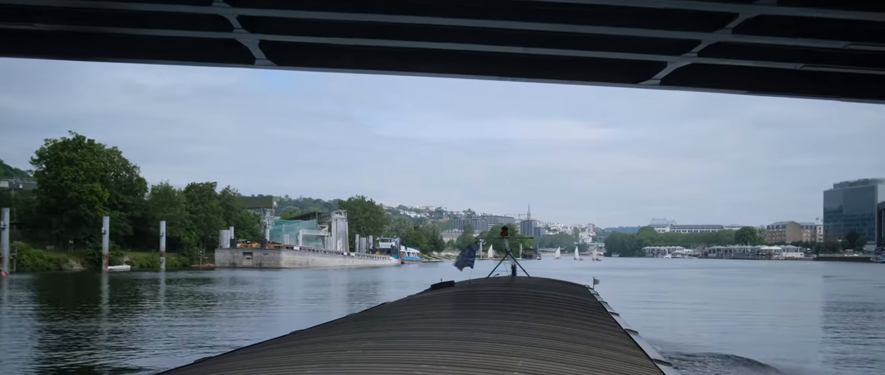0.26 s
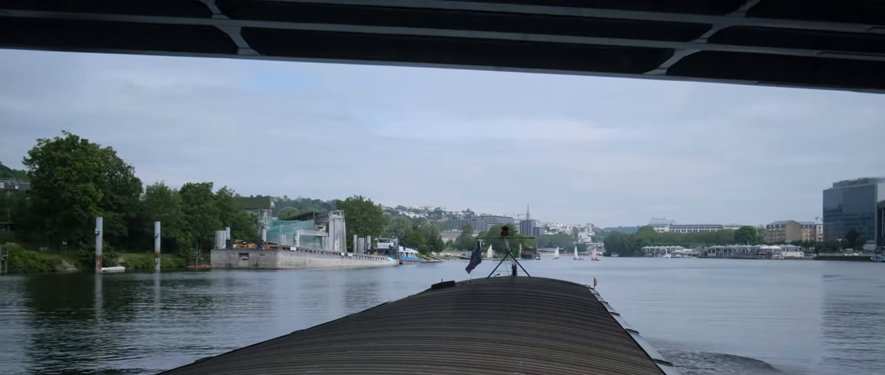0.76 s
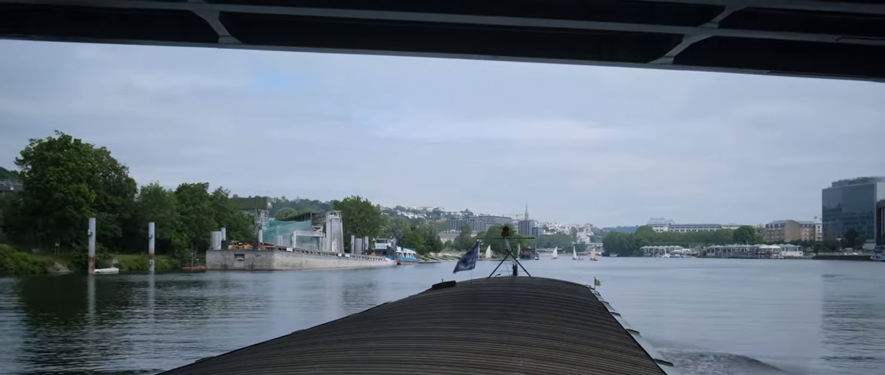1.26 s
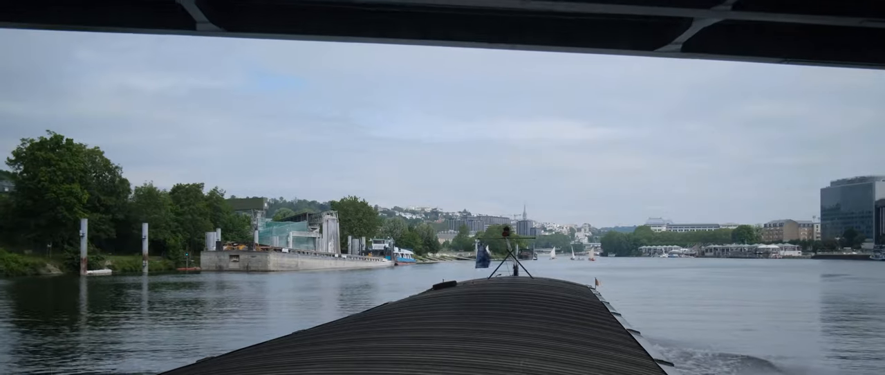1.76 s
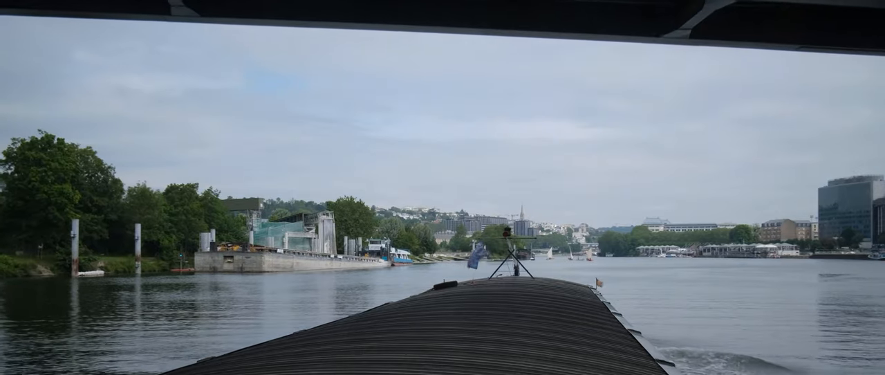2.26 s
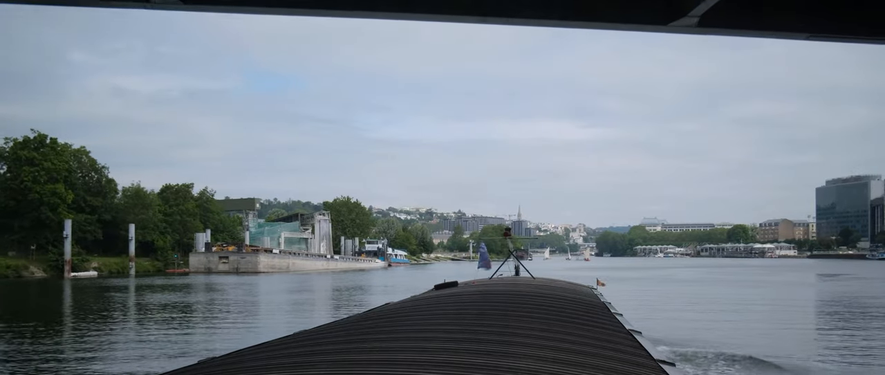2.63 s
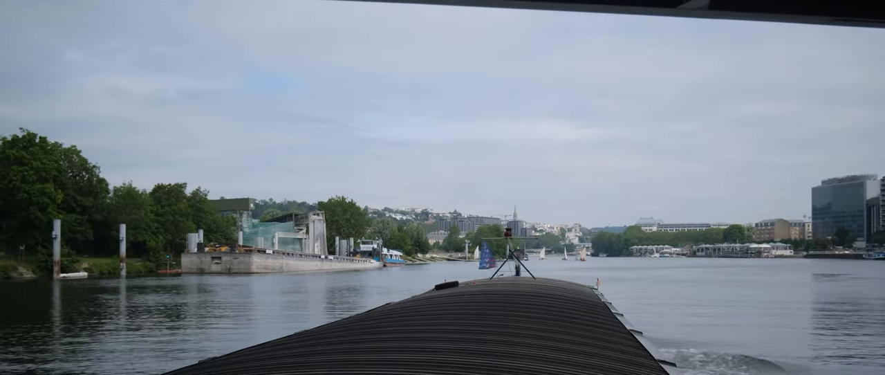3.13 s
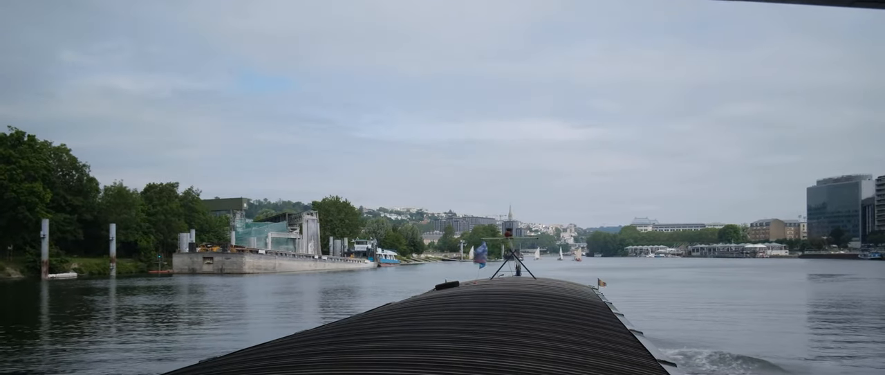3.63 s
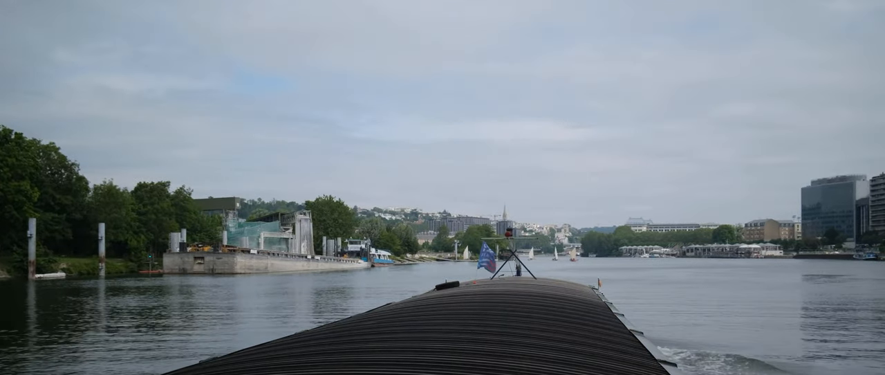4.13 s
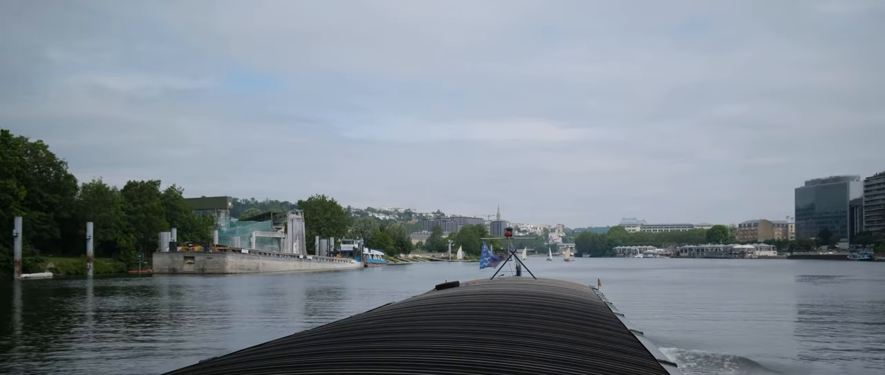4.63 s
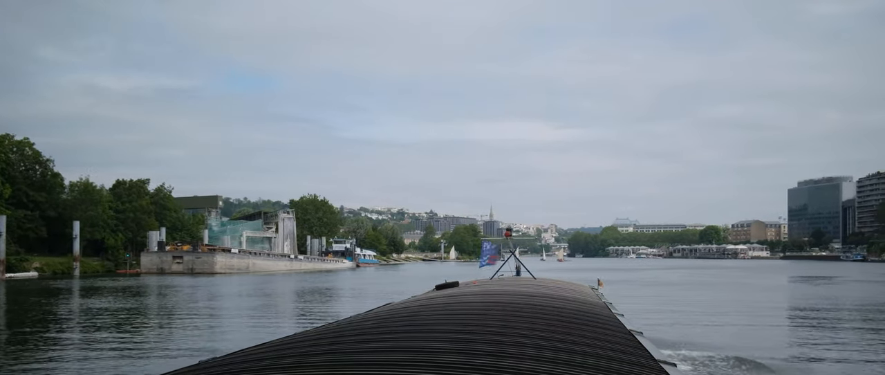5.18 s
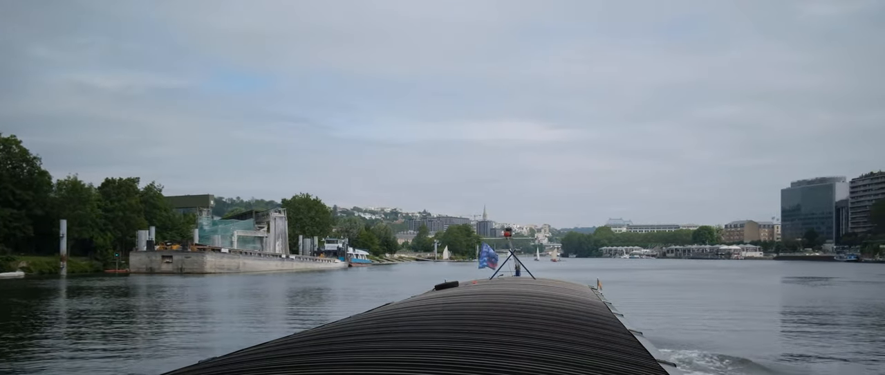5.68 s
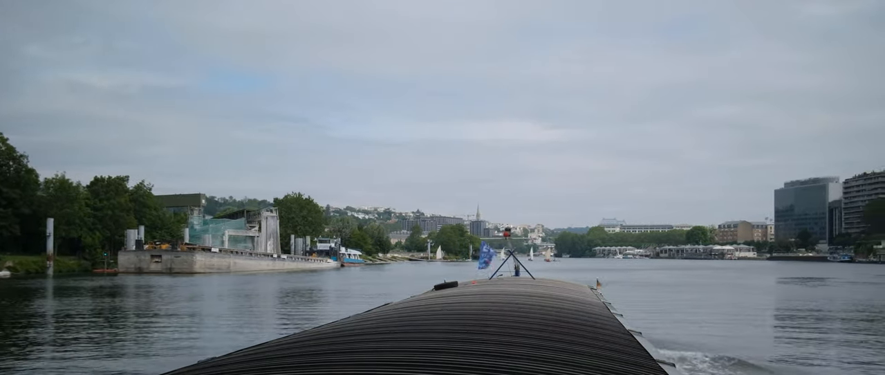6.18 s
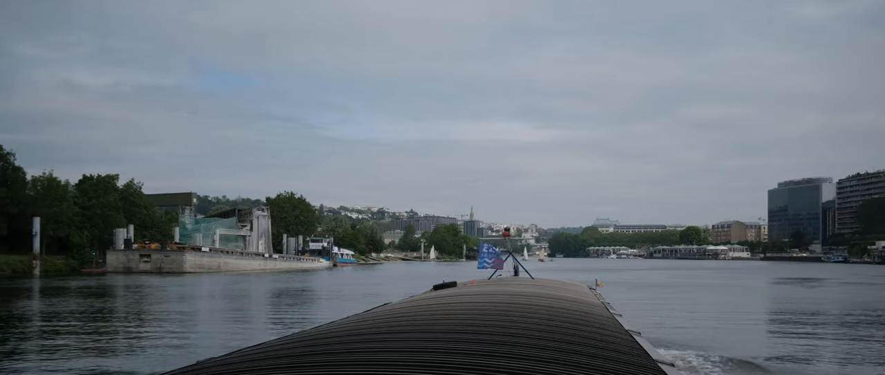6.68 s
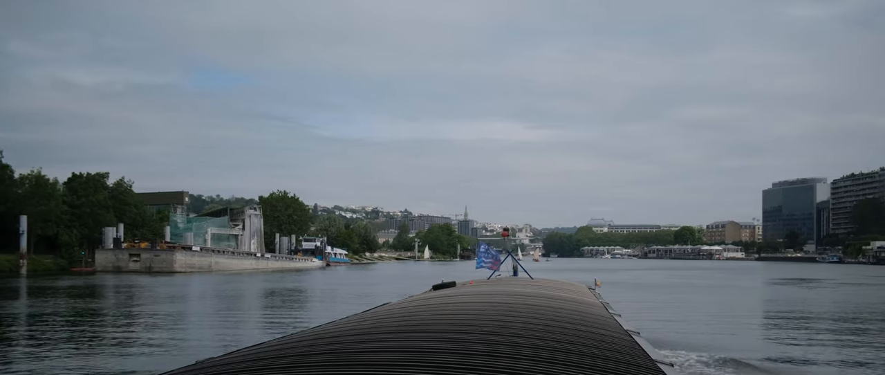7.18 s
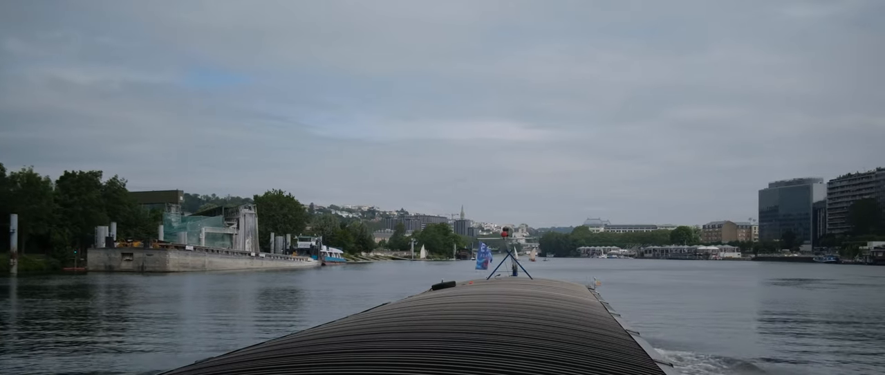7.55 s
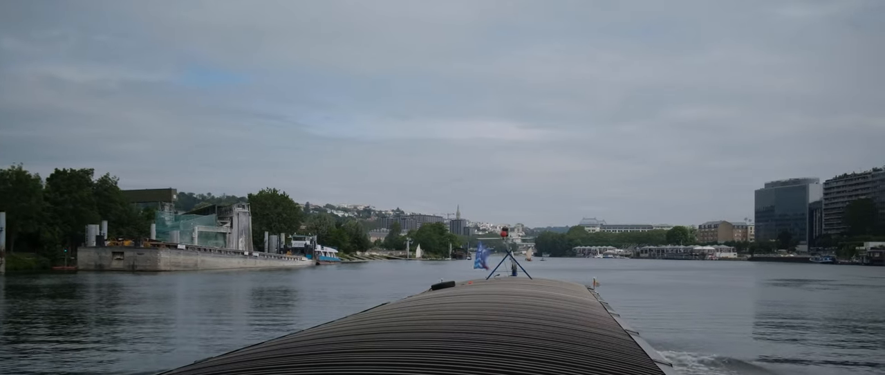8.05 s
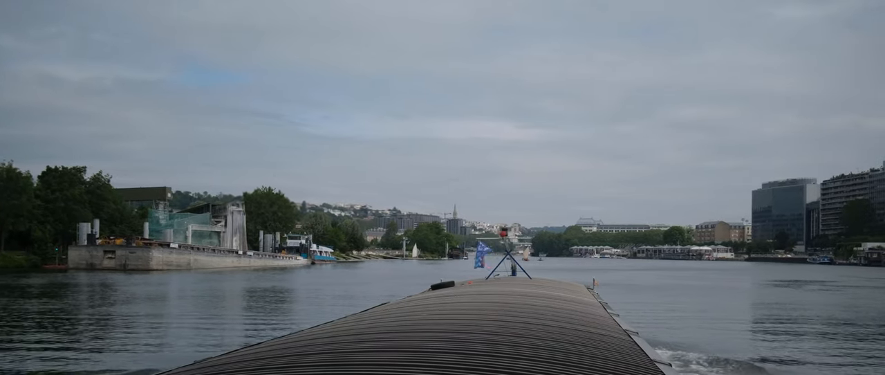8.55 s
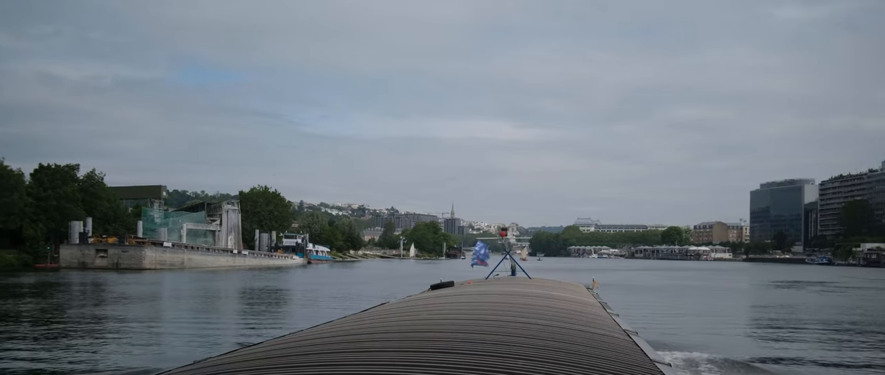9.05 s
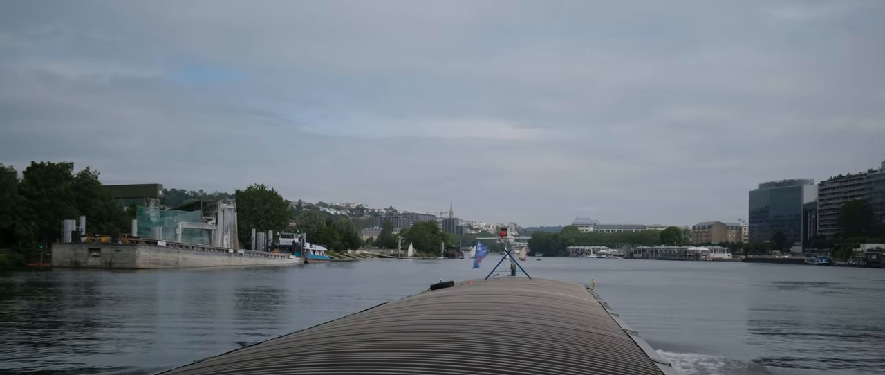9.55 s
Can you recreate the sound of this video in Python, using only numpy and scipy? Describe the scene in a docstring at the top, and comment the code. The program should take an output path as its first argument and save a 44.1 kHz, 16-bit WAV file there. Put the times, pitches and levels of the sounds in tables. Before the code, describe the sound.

A barge's diesel engine drones deep and steady under way, with a slow throb and faint water washing along the hull.

```python
"""A deep, throbbing drone: a barge's six-cylinder diesel at cruising speed, heard from the deck.
Exhaust tones at multiples of the firing rate sound over shaking hull plates and a slowly beating hum.
Behind them are engine-room roar, clinking covers, injector hiss, the river's bow wash and faint ticking.
The drone overloads the microphone on its negative swings, chopping these sounds at the firing rate."""
import sys
import numpy as np
from scipy import signal
from scipy.fft import rfft, irfft, next_fast_len
from scipy.io import wavfile
from scipy.ndimage import map_coordinates

SR = 44100
rng = np.random.default_rng(int(sys.argv[2]) if len(sys.argv) > 2 else 0)


def transcribe(signal):
    """Save signal, clipped to [-1, 1], as a 16-bit WAV file at the path in sys.argv[1]."""
    frames = np.atleast_2d(signal).T
    limited = np.clip(frames, -1, 1)
    pcm = np.round(limited * 32767).astype(np.int16)
    wavfile.write(sys.argv[1], SR, pcm)


N = 432621
TIME_S = np.arange(N) / SR
CYLINDERS = 6


def amp(db):
    """Decibels to gain."""
    return 10 ** (np.asarray(db) / 20)


def unit(x):
    """Scale to rms 1."""
    return x / np.sqrt(np.mean(x ** 2) + 1e-20)


def curve(rows):
    """Interpolate (seconds, value) rows to one value per sample."""
    return np.interp(TIME_S, *np.transpose(rows))


def wobble(rate_hz):
    """Smooth random curve, rate_hz knots a second."""
    grid = np.arange(0, N + 64, 64)
    coarse = map_coordinates(rng.standard_normal(size=1024), [grid * rate_hz / SR], mode="wrap")
    return np.interp(np.arange(N), grid, coarse)


def bouts_db(rows, edge_s):
    """Gain that rises, holds and falls back for each row."""
    return sum(db * np.clip(np.minimum(TIME_S - start_s, start_s + length_s - TIME_S) / edge_s + .5, 0, 1)
               for start_s, length_s, db in rows)


def filtered(x, response):
    """Apply a frequency response, with mirrored ends."""
    pad = SR // 4
    size = next_fast_len(N + 2 * pad)
    wide = np.pad(x, pad, mode="reflect", reflect_type="odd")
    return irfft(rfft(wide, size) * response(np.fft.rfftfreq(size, 1 / SR)), size)[pad:pad + N]


def coloured(x, points):
    """Shape x by (Hz, dB) points on a log axis, to rms 1."""
    hz, db = np.transpose(points)
    size = next_fast_len(N)
    gain = amp(np.interp(np.log(np.fft.rfftfreq(size, 1 / SR) + 1), np.log(hz), db))
    return unit(irfft(rfft(x, size) * gain, size)[:N])


def lowpass(x, hz):
    """One-pole low-pass."""
    return signal.lfilter(*signal.butter(1, hz, fs=SR), x)


def coding_noise(level_db=-59.5):
    """A faint steady hiss, like audio-coding noise, continues through the overloaded troughs."""
    # Each row: frequency in Hz, relative density in dB.
    spectrum = [(200, 6.5), (1500, 7), (4000, -0.5), (7000, -8.5), (10500, -16), (16000, -16)]
    return amp(level_db) * coloured(rng.standard_normal(N), spectrum)


def ticking(cycle, scatter_db=7, offbeat_db=-3, t60_s=.004, sizzle=.17):
    """Something loose sizzles in bouts and ticks twice per shaft turn, strong then weak."""
    # Each row: start in seconds, length in seconds, gain of the shaking in dB.
    bouts = [(2.552, .4, 4), (4.3, .55, 4), (5.35, .45, 4), (6.151, .5, 5), (7.398, 1.3, 2.5),
             (9.25, .35, 3.5)]
    # Each row: frequency in Hz, relative density in dB.
    spectrum = [(3000, -20.5), (6000, -5), (9500, -2), (12000, -2), (16000, 0.5)]
    at = np.flatnonzero(np.diff(np.floor(2 * cycle / np.pi + .5)))
    accent_db = offbeat_db * (np.arange(len(at)) % 2) + scatter_db * rng.uniform(-1, 1, len(at))
    blows = np.bincount(at, amp(accent_db), N)
    decay = amp(-60 * np.arange(SR // 20) / SR / t60_s)
    ticks = (signal.fftconvolve(blows, decay)[:N] + sizzle) * rng.standard_normal(N)
    shaking = amp(-70.5 + bouts_db(bouts, edge_s=.2))
    force = np.maximum(shaking - amp(-75), 0)  # slack takes up part of the shaking
    return 2 * force * coloured(ticks, spectrum)


def bow_wash(level_db=-52.5, dip_db=5.5, calm_until_s=1.1, rise_s=1.8, grain_db=1.37, surge_db=.5):
    """Water fizzes along the hull, lower at first, and swells with the waves."""
    # Each row: start of a swell in seconds, length in seconds, gain in dB.
    swells = [(1.4, .52, 7.5), (4.6, 0.45, 2), (7.45, .4, 2.5), (8.2, .7, 2)]
    # Each row: frequency in Hz, relative density in dB.
    spectrum = [(300, -6.5), (1200, 0), (2200, 0.5), (3000, -2.5), (4000, -4.5), (5000, -9), (6500, -14.5),
                (8300, -18.5), (10500, -30.5), (15500, -32.5)]
    calm = np.clip(1 - (TIME_S - calm_until_s) / rise_s, 0, 1)
    wash_db = level_db - dip_db * calm + bouts_db(swells, edge_s=.3)
    fizz = rng.standard_normal(N) * amp(grain_db * wobble(90))
    return amp(wash_db + surge_db * wobble(6)) * coloured(fizz, spectrum)


def splashes(rise_s=.015):
    """Waves break on the side in quick, bright bursts of spray."""
    # Each row: start in seconds, level in dB, t60 in seconds.
    waves = [(1.46, -48.5, 2.0), (7.439, -48.5, 1.3)]
    # Each row: frequency in Hz, relative density in dB.
    spectrum = [(600, -11.5), (2500, 4), (4500, -2), (8500, -18), (13000, -29)]
    envelope = np.zeros(N)
    for start_s, db, t60_s in waves:
        age_s = np.maximum(TIME_S - start_s, 0)
        envelope += amp(db - 60 * age_s / t60_s) * (1 - np.exp(-age_s / rise_s))
    return envelope * coloured(rng.standard_normal(N), spectrum)


def injectors(firing, level_db=-56.5):
    """Fuel injection hisses just before each exhaust pulse."""
    # Each row: frequency in Hz, relative density in dB.
    spectrum = [(500, -11.5), (1500, 4.5), (3800, -2.5), (5200, -10.5), (8300, -16.5), (11000, -25.5),
                (15500, -30.5)]
    gate = np.exp(-np.sin(firing))
    return amp(level_db) * coloured(gate * rng.standard_normal(N), spectrum)


def covers(cycle, clatter_db=-56.5, clink_gain_db=35):
    """Valve clatter keeps the steel covers ringing; now and then a loose one clinks."""
    # Each row: resonance in Hz, width in Hz, gain in dB.
    modes = [(1728, 99, 6.5), (3010, 160, -1.5), (3940, 140, -11), (5200, 170, -22.5), (7940, 200, -25)]
    # Each row: time in seconds, relative strength in dB.
    clinks = [(0.9428, -46.5), (3.099, -44.5), (3.4972, -46), (3.7265, -42.5), (4.0212, -39.5),
              (4.119, -49), (4.3328, -49), (4.8097, -44), (5.5957, -42.5), (6.0223, -40.5), (7.5723, -45),
              (7.7199, -42.5), (8.431, -43.5), (8.8088, -50.5), (9.5, -40.5)]

    def ring(hz):
        return sum(amp(db) * 1j * hz * width_hz / (mode_hz ** 2 - hz ** 2 + 1j * hz * width_hz)
                   for mode_hz, width_hz, db in modes)

    taps = rng.standard_normal(N) * amp(.85 * np.cos(2 * cycle) + 2.5 * wobble(40))
    clink_s, clink_db = np.transpose(clinks)
    blows = np.bincount((clink_s * SR).astype(int), amp(clink_db + clink_gain_db), N)
    return amp(clatter_db) * unit(filtered(taps, ring)) + filtered(blows, ring)


def engine_room(firing, overtone_db, level_db=-27.5, pulse_depth=.066):
    """Combustion roar swells with each firing and partly follows the exhaust's overtones."""
    # Each row: frequency in Hz, relative density in dB.
    spectrum = [(15, -10.5), (30, -1.5), (80, 3.5), (140, 2.5), (220, 1), (330, -6), (500, -8.5),
                (750, -12.5), (1000, -19.5), (1500, -31), (2500, -38.5), (6000, -74.5)]
    roar_db = level_db + .27 * overtone_db + .21 * wobble(11)
    pulsing = 1 + pulse_depth * np.cos(firing)
    return amp(roar_db) * coloured(pulsing * rng.standard_normal(N), spectrum)


def hum(cycle, beat, level_db=-24.5, swing_db=2.5, waver_db=.35):
    """A low hum just under twice the shaft rate beats slowly against the engine."""
    return amp(level_db + swing_db * np.cos(beat) - waver_db * wobble(1.4)) * np.sin(4 * cycle - beat)


def hull(cycle, beat, boom_db=-25.5, swing_db=4, waver_db=2, shimmer_db=3.5, drift_rad=.5):
    """Unequal cylinders shake the plates in drifting tones; the strongest booms with the slow beat."""
    # Each row: multiple of the four-stroke cycle rate, rms level in dB.
    orders = [(2, -48.5), (4, -42), (5, -40), (8, -43), (9, -44), (10, -30), (11, -40.5), (13, -31.5),
              (14, -46.5), (15, -42), (19, -52), (20, -48.5), (21, -47.5), (22, -52), (25, -43), (27, -57),
              (34, -48.5), (40, -55), (46, -57), (48, -52.5), (54, -53.5), (60, -52.5), (78, -53),
              (84, -59)]
    boom = np.cos(16 * cycle + drift_rad * wobble(1.5))
    out = amp(boom_db + swing_db * np.cos(beat) + waver_db * wobble(4)) * boom
    for order, db in orders:
        phase = order * cycle + rng.uniform(0, 2 * np.pi) + drift_rad * wobble(3)
        out += np.sqrt(2) * amp(db + shimmer_db * wobble(4.4)) * np.cos(phase)
    return out


def pipe_ring(firing, overtone_db, level_db=-30, waver_db=3.14):
    """The pipe rings at four times the firing rate, waxing and waning."""
    return amp(level_db + overtone_db + waver_db * wobble(4)) * np.cos(4 * firing - np.pi / 4)


def exhaust(firing, overtone_db, third_db=-24.5, overtone_lag_rad=.22):
    """Each firing is one deep swing of a tone and its octave; overtones flatten the trough."""
    # Each row: time in seconds, peak level of the firing tone in dB.
    tone_levels = [(0, -8.5), (1.1, -10.5), (1.7, -8.5), (2.9, -9), (3.35, -7.5), (4.9, -8.5), (6.4, -6.6),
                   (7.9, -7), (9.8, -7.8)]
    # Each row: time in seconds, peak level of the octave in dB.
    octave_levels = [(0, -10), (.8, -9), (2.4, -13), (2.95, -11), (3.45, -15.5), (3.9, -11.5), (5.2, -10.5),
                     (6.4, -13), (7.4, -12), (7.9, -14), (9.1, -8.5), (9.55, -14.5), (9.8, -14)]
    # Each row: multiple of the firing rate, peak level in dB, polarity.
    upper_tones = [(5, -35.5, 1), (6, -37.5, -1), (7, -45, 1)]
    late = firing - overtone_lag_rad
    out = -amp(curve(tone_levels) + .98 * wobble(4)) * np.cos(firing)
    out -= amp(curve(octave_levels) + 1.28 * wobble(25)) * np.cos(2 * late)
    out += amp(third_db + overtone_db + 3.5 * wobble(4)) * np.cos(3 * late)
    for order, db, polarity in upper_tones:
        out += polarity * amp(db + .15 * overtone_db + 2.5 * wobble(2.2)) * np.cos(order * late)
    return out


def scene():
    """Engine speed drives all the machinery; the water runs independently."""
    # Each row: time in seconds, firing rate in Hz.
    speed = [(0, 60.95), (1.7, 60.82), (2.3, 60.7), (3.1, 60.87), (3.8, 60.75), (4.4, 60.96), (6.7, 60.77),
             (7.4, 60.6), (8.3, 60.58), (9.8, 60.78)]
    # Each row: time in seconds, gain of the exhaust's overtones in dB.
    overtone_gains = [(0, -1), (1, -6.5), (2.5, -6), (3.2, -0.5), (4.1, -2.5), (5.2, 2), (7.3, 1),
                      (8.1, -2), (9.1, 3.5), (9.8, -3.5)]
    beat_hz, beat_crest_s = .534, 2.414
    overtone_db = curve(overtone_gains)
    firing = 2 * np.pi * np.cumsum(curve(speed)) / SR  # phases in radians
    cycle = firing / CYLINDERS  # one cycle is two shaft turns
    beat = 2 * np.pi * beat_hz * (TIME_S - beat_crest_s)  # the hum's lag behind the engine
    drone = exhaust(firing, overtone_db)
    body = hull(cycle, beat) + hum(cycle, beat)
    machinery = engine_room(firing, overtone_db) + covers(cycle)
    water = bow_wash() + splashes()
    ticks = ticking(cycle)
    ring_and_hiss = pipe_ring(firing, overtone_db) + injectors(firing)
    return (drone + body + machinery + water + ticks + ring_and_hiss)[None]


def overload(x, limit=.495, knee=.016, overshoot=.23, attack_hz=790, settle_hz=228):
    """Negative swings hit a stop, push a little past it and settle back while pinned."""
    clipped = knee * np.logaddexp(0, (x + limit) / knee) - limit
    at_stop = (1 - np.tanh((x + limit) / (4 * knee))) / 2
    pinned = lowpass(at_stop, attack_hz)
    return clipped - overshoot * pinned * (1 - lowpass(pinned, settle_hz))


def record(dry):
    """The microphone overloads and sheds the deepest bass; coding noise and a band limit follow."""
    low_cut_hz, top_hz = 3.6, 15830
    x = overload(dry[0])
    x -= lowpass(x, low_cut_hz)
    x += coding_noise()
    return filtered(x, lambda hz: hz < top_hz)[None]


dry = scene()
out = record(dry)
transcribe(out)
```